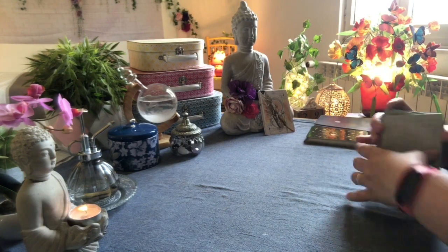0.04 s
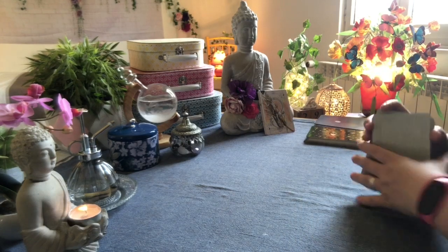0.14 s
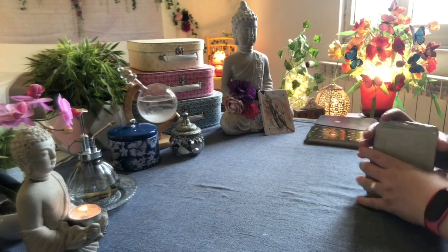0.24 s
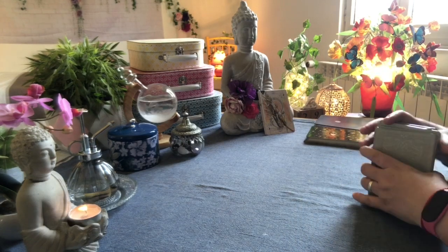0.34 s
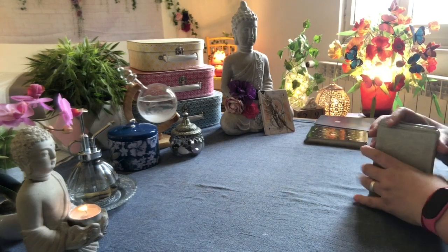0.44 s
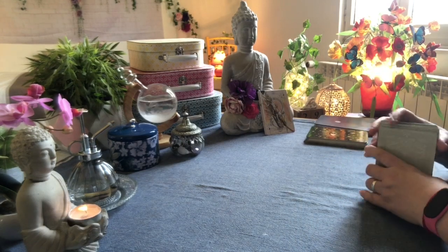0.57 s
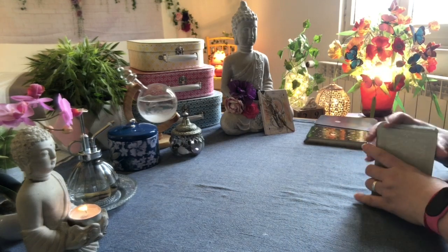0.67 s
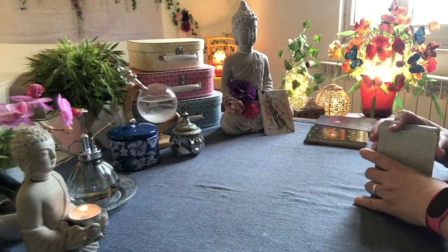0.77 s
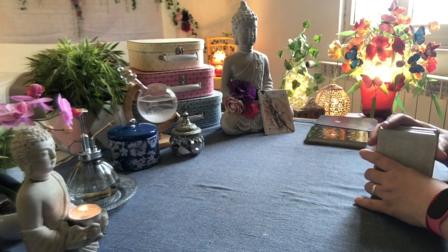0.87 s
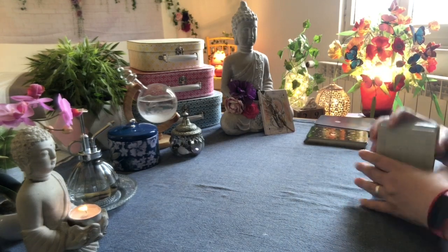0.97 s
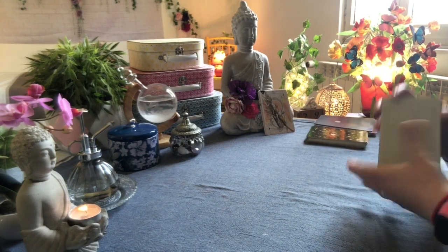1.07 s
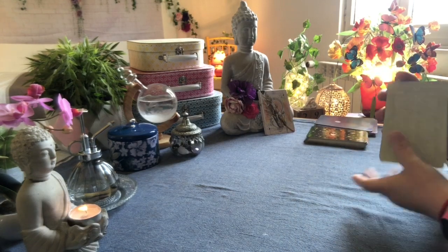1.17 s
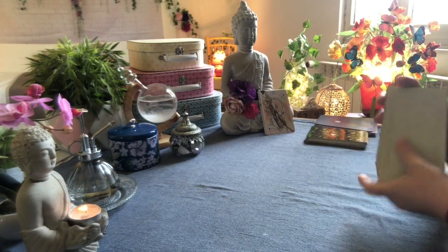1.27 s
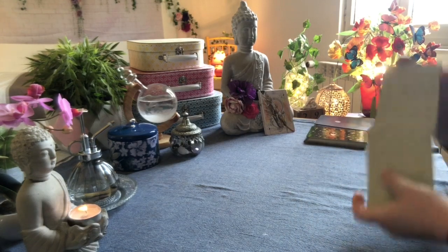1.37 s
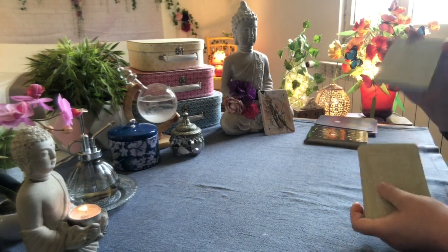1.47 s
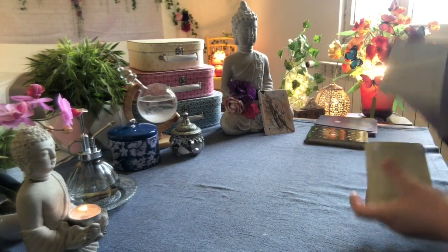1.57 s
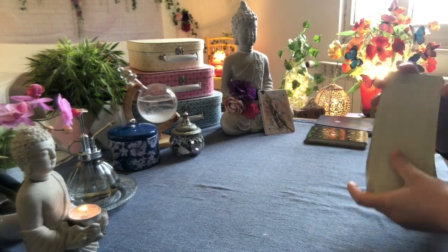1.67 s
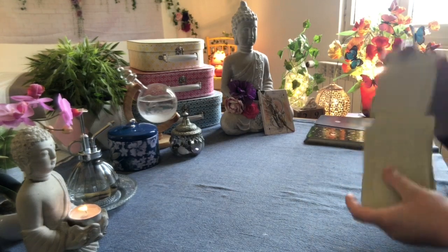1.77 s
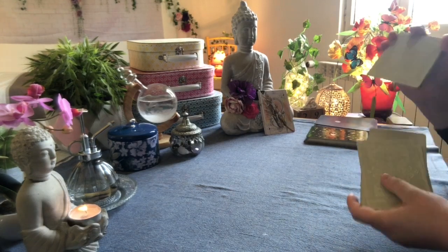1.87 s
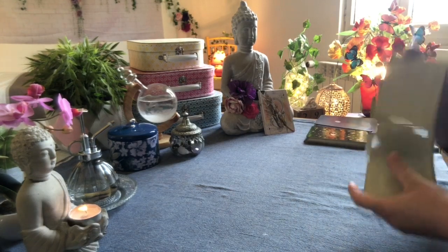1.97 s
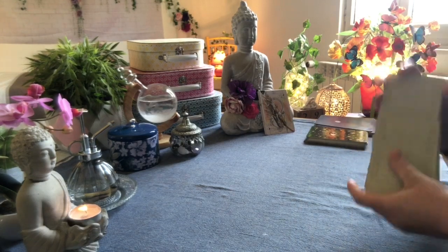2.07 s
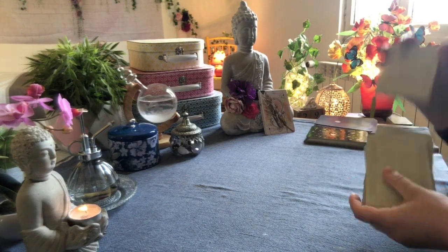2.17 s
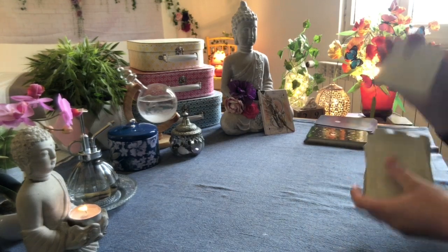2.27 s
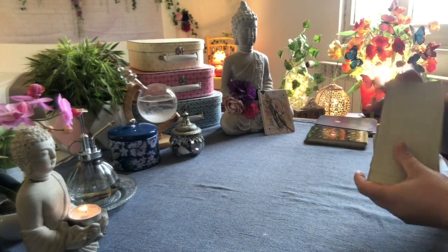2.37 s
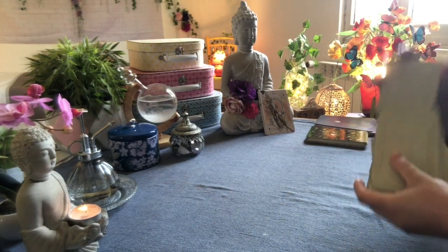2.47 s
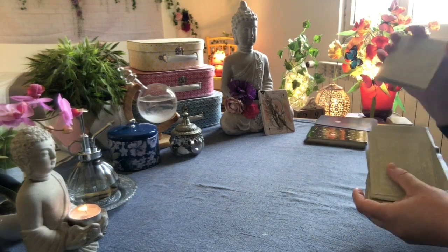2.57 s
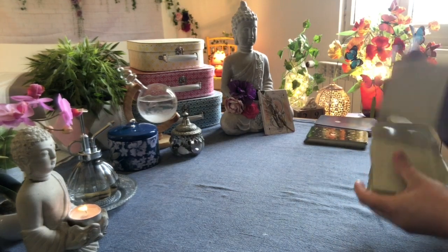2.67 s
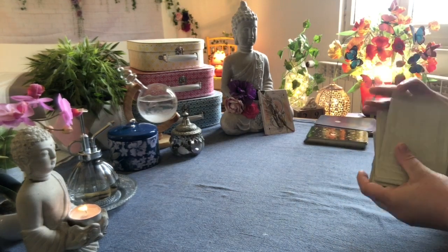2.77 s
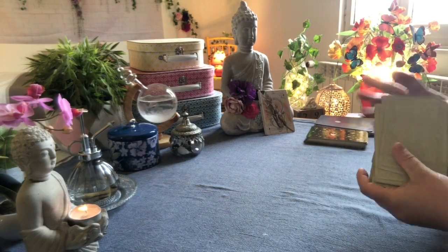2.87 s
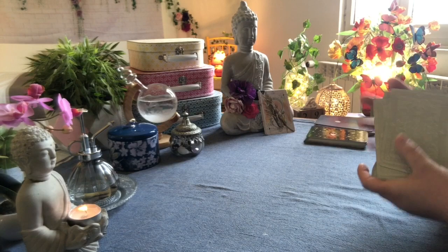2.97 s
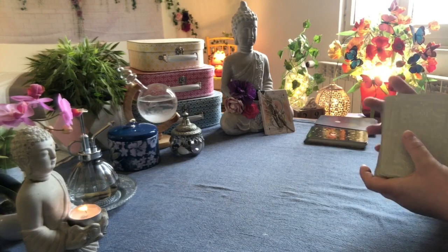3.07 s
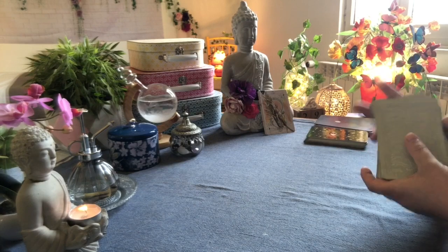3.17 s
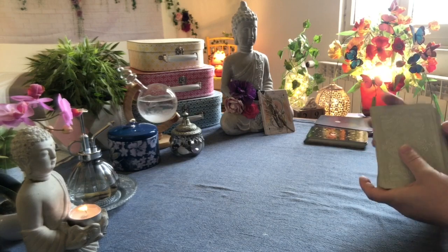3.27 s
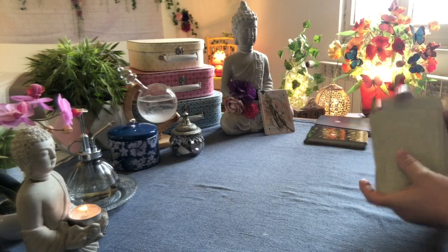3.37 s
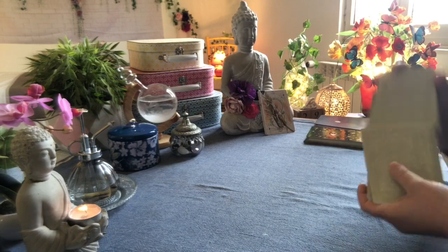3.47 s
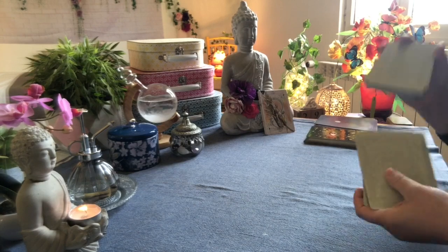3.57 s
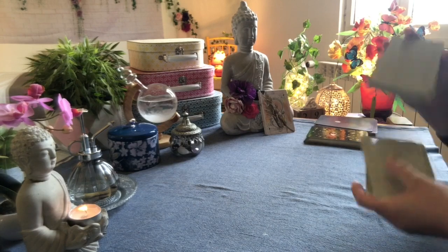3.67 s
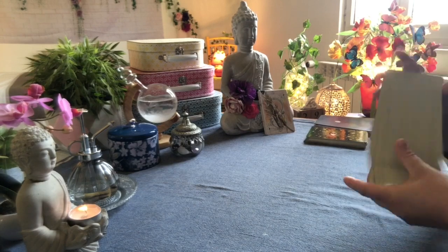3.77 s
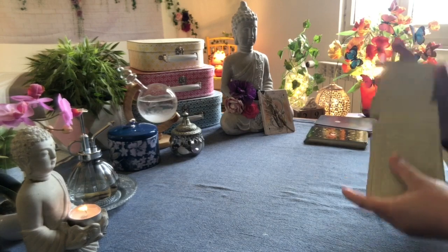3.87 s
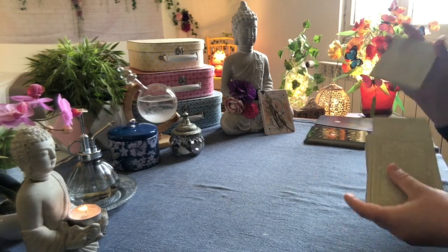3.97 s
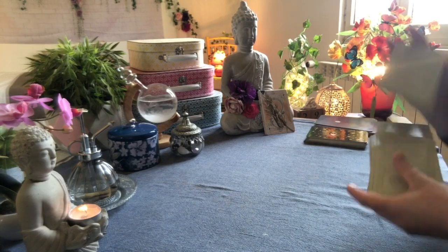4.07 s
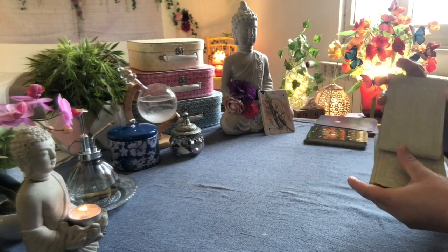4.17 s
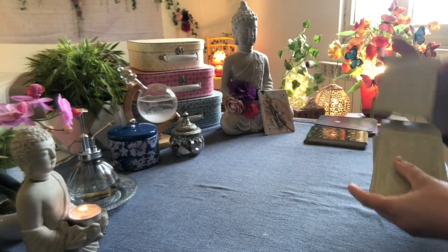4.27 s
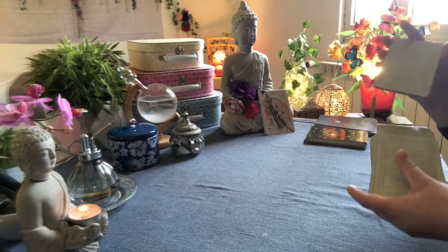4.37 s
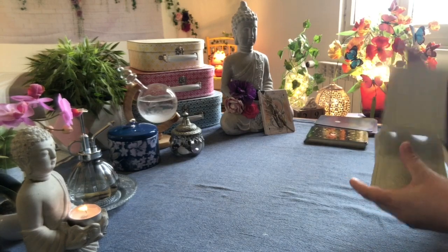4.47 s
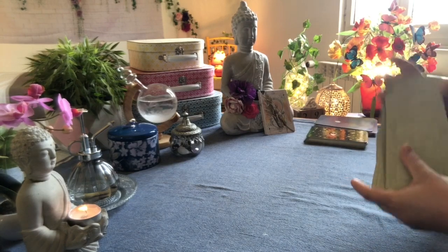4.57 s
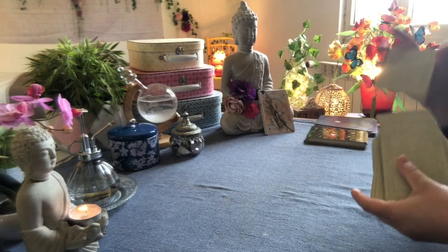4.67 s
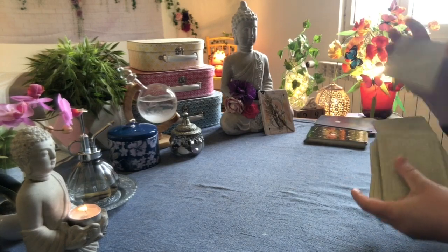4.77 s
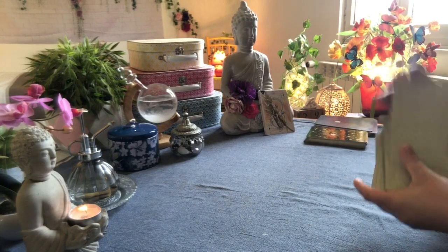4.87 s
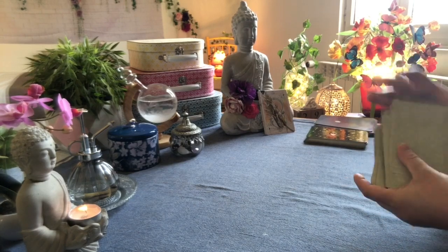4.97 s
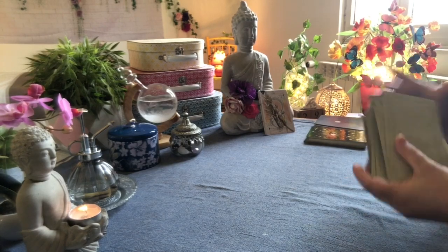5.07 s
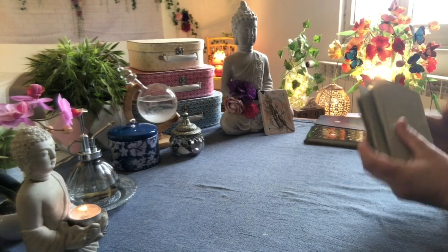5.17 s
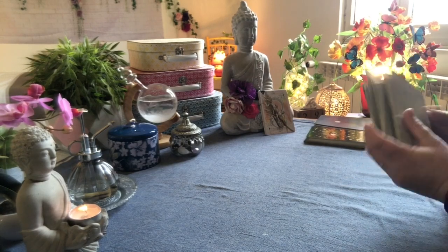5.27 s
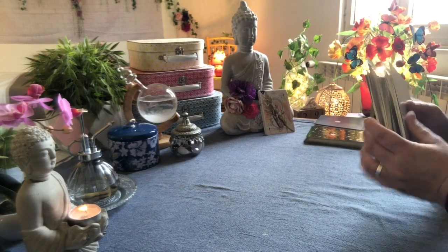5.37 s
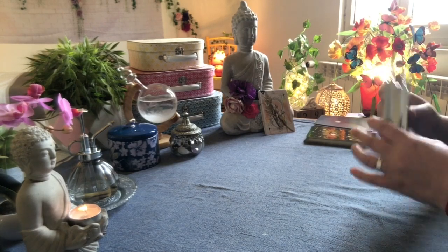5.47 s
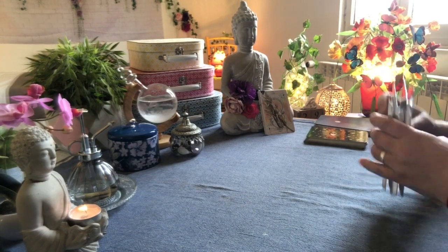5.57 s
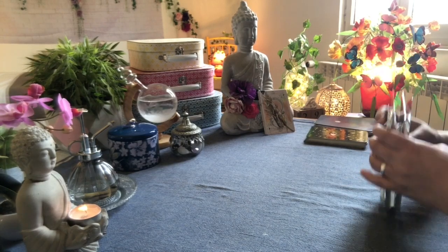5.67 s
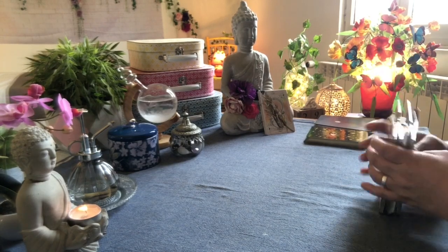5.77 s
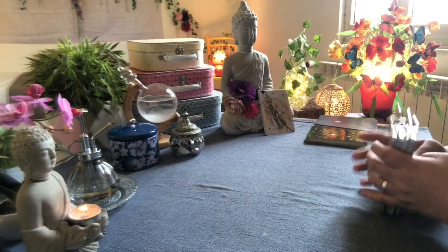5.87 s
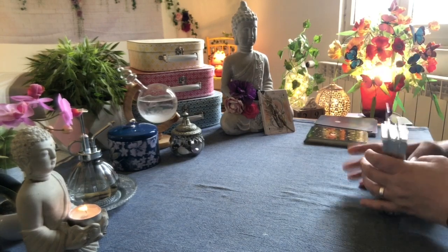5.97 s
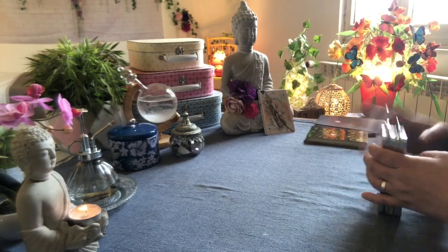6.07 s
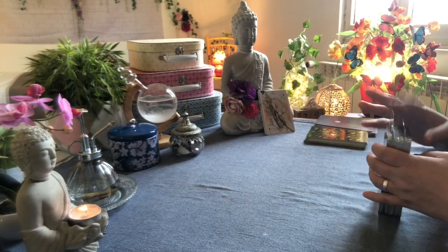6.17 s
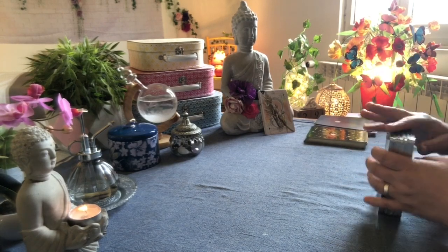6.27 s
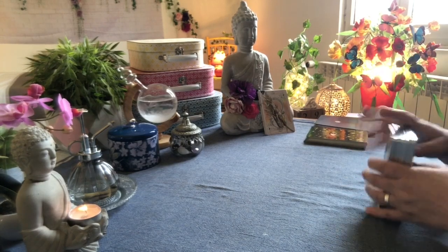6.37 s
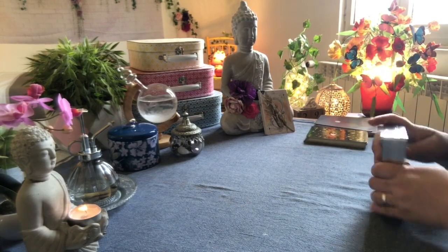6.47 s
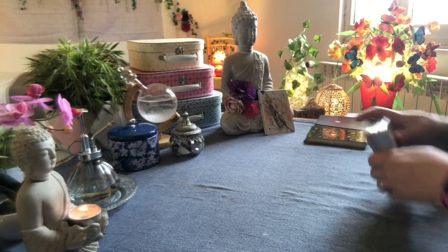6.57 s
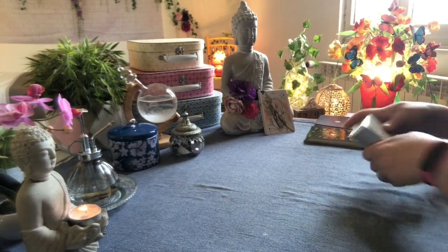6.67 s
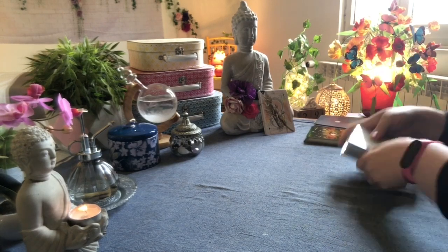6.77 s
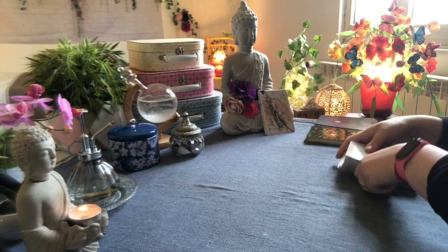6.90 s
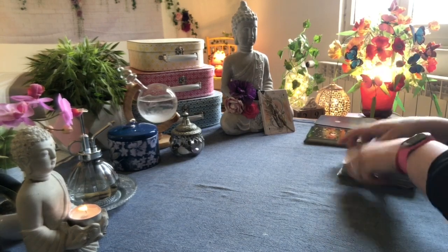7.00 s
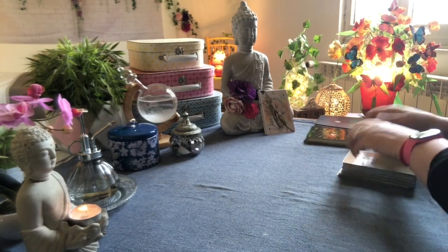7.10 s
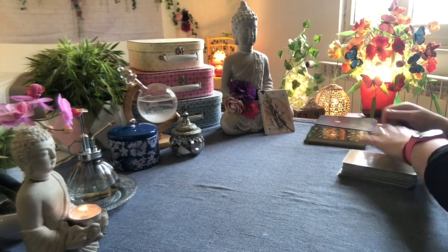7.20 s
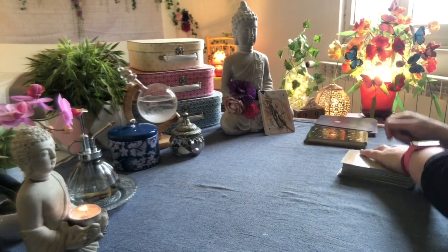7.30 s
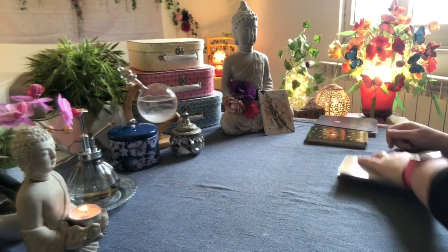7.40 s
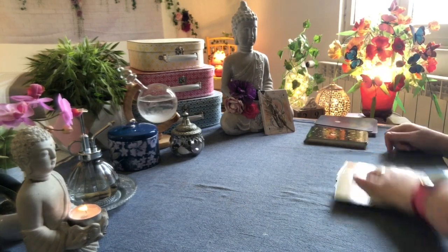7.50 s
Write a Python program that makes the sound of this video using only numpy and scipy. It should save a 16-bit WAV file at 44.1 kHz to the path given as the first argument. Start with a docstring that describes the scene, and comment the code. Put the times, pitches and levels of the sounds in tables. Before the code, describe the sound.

Large stiff cards are shuffled by hand close to a mono microphone, over faint steady room hush. After an early hollow table knock and light finger rubs come separate flicks, then slaps of packets dropping, each with a brief airy ring and a fading slide. The strongest cracks fall midway and slightly later. Finally sharp, low-booming table knocks and soft rustling as the deck is set down.

```python
"""Small, quiet room, cloth-covered table, heard close in mono: fingers rub a deck of large cards over a hush.
The deck is knocked square on the table, which booms. Then comes an overhand shuffle above it: packets slap
down with a burst of noise and a ring of squeezed air, slide on as clumped friction grains and tick off
the edge; two duller knocks mark a packet leaving the deck, and some cards squeak. At the end damped table
modes boom again as the deck is knocked square and laid down. Sparse, darkening reflections set the room."""
import sys
import numpy as np
from scipy import signal
from scipy.fft import rfft, irfft
from scipy.io import wavfile
from scipy.ndimage import uniform_filter1d

SR = 44100
rng = np.random.default_rng(int(sys.argv[2]) if len(sys.argv) > 2 else 0)


def unload_audio(sound):
    """Save the sound as a 16-bit wav file, at the path given as the first command line argument."""
    columns = np.transpose(np.atleast_2d(sound))
    # keep every value between -1 and 1, then stretch to whole-number steps
    steps = np.round(np.clip(columns, -1, 1) * 32767)
    wavfile.write(sys.argv[1], SR, steps.astype(np.int16))


N = 332514  # length in samples

# Event levels are relative: each source adds its own gain below.
# fingers and cards rubbing lightly, one row a movement:
# start_s, length_s, level_db, fastest_share (0-1 of the length), brightness_db_per_octave
RUB_MOVES = [(0.0, 0.036, -50, 0, -1.5), (0.202, 0.047, -53.5, 0.44, .5), (0.263, 0.052, -58, 0.4, 0.5),
             (0.417, 0.057, -62.5, .8, 3), (0.529, 0.062, -61, 0.18, 0), (0.667, 0.05, -61.5, 0.15, 4),
             (0.876, .33, -69, 0, 6.5), (1.231, 0.2, -53.5, 0.3, 1), (1.614, 0.063, -56, 0.47, 0.5),
             (1.999, 0.03, -64, 0.3, -1), (2.02, .009, -42, .9, 3), (2.359, 0.02, -43, 1, 0.5),
             (2.958, 0.097, -52, 0.45, -0.5), (3.064, 0.15, -65, 0.04, 5), (3.258, 0.2, -56.5, .5, 2.5),
             (3.471, 0.041, -53, .35, 2.5), (3.711, .03, -56, 0, -0.5), (3.76, 0.037, -56, 1, 1),
             (4.114, .045, -60.5, 0.67, 0), (4.164, 0.053, -52, 0, 2), (5.224, .025, -57, .3, -1),
             (5.269, 0.12, -54.5, .35, -.5), (5.359, 0.14, -59.5, 0.62, -1),
             (5.554, 0.061, -60.5, 0.54, 1.5), (5.694, .125, -54.5, 0, -1), (5.831, 0.21, -58, 0.18, 1.5),
             (6.204, 0.056, -52.5, 0.4, 3), (6.3, 0.26, -66, 0.7, 2.5), (6.59, 0.21, -66.5, 0.1, 1.5),
             (6.829, 0.028, -58, .5, -3), (6.892, 0.11, -58, 0.55, 0), (7.031, 0.044, -48, 0, -4.5),
             (7.2, 0.28, -62, 0.87, -3), (7.466, 0.17, -52, 0.6, -1.5)]
# the deck and hands meeting the table: start_s, knock_db, pitch_hz, boom_db, top_ring_db, contact_decay_s
TABLE_KNOCKS = [(0.228, -35.5, 486, -45.5, -37.5, 0.014), (0.553, -52, 1220, -60, -84, 0.0042),
                (0.695, -67, 400, -58.5, -70, 0.0074), (0.74, -57, 700, -71, -79, 0.0033),
                (0.863, -56, 380, -50, -63, 0.0027), (5.7, -23.5, 930, -32, -39.5, 0.0026),
                (5.72, -40, 1010, -49, -57, 0.008), (5.779, -36, 483, -41.5, -47, 0.0042),
                (6.016, -55.5, 370, -53, -79, 0.0059), (6.228, -52, 410, -45, -46.5, 0.047),
                (6.252, -37.5, 760, -47, -51, 0.006), (6.46, -68, 397, -59.5, -62.5, 0.0083),
                (6.837, -56.5, 383, -39, -57, 0.0091), (7.038, -37, 707, -31.5, -42, 0.0025),
                (7.315, -60, 215, -57, -67, 0.01), (7.372, -61.5, 284, -53, -57, 0.02),
                (7.518, -73, 630, -39.5, -54, 0.0067)]
# card edges snapping past each other: start_s, level_db, bright_snap_db
EDGE_TICKS = [(0.404, -48, -72), (1.2348, -45, -59), (1.4115, -30, -54), (1.8082, -28.5, -48),
              (1.991, -45, -63), (2.142, -37, -60), (2.4735, -28, -37), (2.5173, -36, -64),
              (2.7516, -42, -46), (2.962, -36.5, -77), (3.0615, -45, -69), (3.1058, -41.5, -61),
              (3.5234, -34, -53.5), (3.7158, -50, -66), (4.1659, -35.5, -51), (4.4318, -56, -79),
              (4.6844, -37.5, -50.5), (4.854, -46.5, -76), (4.9929, -33.5, -45), (5.128, -45.5, -74),
              (5.217, -46, -75), (5.3028, -38, -76)]
# packets slapping down on the deck, and two duller knocks (2.8089 s, 3.940 s) as a packet leaves it:
# start_s, clap_db, trapped_air_db, palm_push_db, clap_decay_s, air_pitch_hz, clap_lowpass_hz
PACKET_HITS = [(1.669, -30.5, -29, -34, 0.0045, 2780, 7100), (2.031, -39.5, -72, -47, 0.0021, 2540, 8000),
               (2.038, -39, -37, -43, .003, 2570, 6000), (2.056, -28, -60, -49, 0.00087, 2450, 9000),
               (2.063, -32, -55, -43.5, 0.0021, 2490, 8000), (2.3714, -21, -24, -30.5, 0.00043, 2630, 6900),
               (2.707, -30, -40, -42, 0.0012, 2660, 14000), (2.714, -29.5, -25, -40, 0.0031, 2720, 12000),
               (2.761, -34.5, -52, -47.5, 0.0045, 2520, 8000),
               (2.8089, -29, -27.5, -43.5, 0.0021, 1890, 5940),
               (3.7958, -15, -26.5, -39.5, 0.0034, 2640, 7900),
               (3.940, -24.5, -32, -42, 0.00039, 2030, 3370), (4.5243, -19, -16.5, -34, 0.0019, 2550, 6430),
               (4.875, -35.5, -38.5, -55, .002, 2645, 8900), (4.919, -40, -56.5, -43, 0.0043, 2480, 14000),
               (4.9535, -32, -38, -68, 0.004, 2500, 4000)]
# the deck bumping softly in the hand: start_s, level_db
HAND_BUMPS = [(1.672, -49.5), (2.035, -46.5), (2.067, -52), (2.156, -55), (2.713, -48.5), (2.74, -54),
              (2.813, -51), (3.064, -57), (4.925, -52.5)]
# packets sliding along the deck, fastest at the start:
# start_s, length_s, level_db, slowing_db_per_s, brightness_db_per_octave
PACKET_SLIDES = [(1.672, 0.129, -35.5, 93, 0.5), (2.032, 0.11, -39.5, 91, 1), (2.375, 0.14, -41, 79, 1),
                 (2.702, 0.11, -42.5, 65, 0.5), (3.804, .134, -35.5, 80, -0.9), (4.53, 0.14, -39, 135, -1),
                 (4.877, .11, -38.5, 140, 0.5)]
# a card catches and sings briefly as it slides: start_s, length_s, pitch_hz, level_db, unsteadiness_rms_share
CARD_SQUEAKS = [(1.976, 0.064, 2230, -61, 0.041), (2.761, 0.012, 778, -35.5, 0.21),
                (2.782, 0.024, 2148, -37, 0.255), (3.457, 0.036, 12650, -55, 0.044),
                (3.851, 0.032, 7600, -37.5, 0.0078), (3.894, 0.03, 7730, -50, 0.0078),
                (4.873, 0.045, 409, -45, 0.35), (4.918, 0.014, 517, -37.5, 0.17),
                (4.927, 0.03, 2300, -45.5, 0.018), (4.941, 0.018, 1846, -39.5, 0.14)]

# modes of table and room, of the table top, and the deepest one: pitch_hz, level_db, t60_s
BOOM_MODES = [(116.85, -2, 0.46), (146.5, -16.5, 0.66), (191.3, -13.5, 0.3)]
TOP_MODES = [(239.7, 6, 0.3), (362.5, 0.5, 0.5), (431, 11.5, 0.065), (494, -35, .35), (608, -8.5, 0.39),
             (795, -23, 0.79), (829, -6.5, 0.42), (910, -15.5, 0.21), (1008, -14.5, 0.045),
             (1158, -9.5, 0.16)]
SWAY_MODES = [(70, -2, 0.87)]

# spectra of the noise in each source: frequency_hz, relative_density_db (per Hz)
HUSH_COLOUR = [(12, -38.5), (20, -9.5), (81, 1), (285, 1), (1760, -13), (7730, -17), (10200, -21),
               (14700, -23.5), (16000, -28)]
RUB_COLOUR = [(180, -24), (300, -3.5), (511, -6), (749, -1.5), (1280, -3), (1530, -2), (1810, -3),
              (4230, -2.5), (7570, -4.5), (10200, -13.5), (12700, -12), (16000, -18.5)]
KNOCK_COLOUR = [(30, -36), (80, 1.5), (200, 11), (450, 8.5), (900, 3), (2000, -10.5), (5000, -1.5),
                (9000, -2), (16000, 1)]
TICK_COLOUR = [(200, -33), (800, -9.5), (2000, 1), (4000, -2.5), (7500, -6.5), (10000, -19.5),
               (16000, -18.5)]
SNAP_COLOUR = [(2000, -22), (9000, -10), (13000, 4.5), (16000, 7.5), (18000, -19.5)]
CLAP_COLOUR = [(200, -36), (700, -8), (1150, -10), (1700, -8), (2400, 3.5), (3500, -3), (5500, -1.5),
               (8000, -5), (10000, -11), (16000, -8)]
PALM_COLOUR = [(50, -30), (130, -22.5), (350, -3.5), (750, -2), (1100, -3.5), (1600, -12), (4000, -52.5)]
BUMP_COLOUR = [(30, -28), (80, -1.5), (160, -0.5), (300, -7.5), (550, -1.5), (1200, -30.5), (4000, -49)]
SLIDE_COLOUR = [(59, -41), (100, -11), (206, -17), (350, -7.5), (634, -11), (1170, -5.5), (1550, -2),
                (2470, -1), (3470, -4), (4380, -2.5), (5770, -5.5), (7450, -2.5), (10000, -9.5),
                (15000, -9.5), (16000, -26.5)]
# decay of the room: frequency_hz, t60_s, relative_level_db
ROOM_DECAY = [(98.9, 0.83, 1), (400, 0.48, -2), (1210, 0.46, 0), (2220, 0.32, -3), (4200, 0.37, -3),
              (7500, 0.17, 2), (15000, 0.17, 1)]

HUSH_DB = -66.5
RUB_SLACK_DB = 9  # a rub starts and ends this much under its fastest moment
PIVOT_HZ = 3000  # brightness tilts the colour of friction about this frequency
TICK_BODY_DB = -21  # the deck's dull knock against the tick, before their colours and gains
SWAY_DB, SWAY_GROWTH = -26, 0.53  # sway level at a boom_db of 0, and its dB per dB of boom
EDGE_HZ = 16050  # upper band limit of the recorder


def amp(db):
    """Decibels to gain."""
    return 10 ** (np.asarray(db) / 20)


def unit(x):
    """Scales to an rms of one."""
    return x / np.sqrt(np.mean(x ** 2) + 1e-20)


def read(points, hz):
    """Reads a table on a log-frequency axis."""
    f, value = np.transpose(points)
    return np.interp(np.log(hz + 1), np.log(f + 1), value)


def add(mix, s, sound):
    """Mixes a sound in at time s."""
    part = mix[max(round(s * SR), 0):][:len(sound)]
    part += sound[:len(part)]


def colour(x, points, size=4096):
    """Causal minimum-phase filter with the given spectrum; white noise keeps its power."""
    gain = unit(amp(read(points, abs(np.fft.fftfreq(size, 1 / SR)))))
    spectrum = np.exp(np.conj(signal.hilbert(np.log(gain))))
    taps = np.fft.ifft(spectrum).real
    return signal.oaconvolve(x, taps[:size // 2])[:len(x)]


def grains(count, spread_db):
    """Tiny contacts of random sign and very uneven size."""
    z = rng.standard_normal((count, 2))
    return unit(z[:, 0] * amp(spread_db * np.clip(z[:, 1], -2, 2)))


def waver(seconds):
    """Smooth chance of rms one that changes on the given time scale."""
    hz = np.fft.rfftfreq(N, 1 / SR)
    slow = rfft(rng.standard_normal(N)) / (1 + (2 * hz * seconds) ** 2)
    return unit(irfft(slow, N))


def burst(decay, spread_db, count=4096):
    """A contact: a dying cluster of clicks whose first moments have an rms near one."""
    shape = np.exp(-np.arange(count) / SR / max(decay, 1 / SR))
    x = grains(count, spread_db) * shape
    return x * np.linalg.norm(shape) / np.linalg.norm(x)


def ring(modes, rise, t, beat=.4):
    """Damped modes that swell over the rise time; each has two close neighbours that beat with it."""
    out = np.zeros(len(t))
    for hz, db, t60 in modes:
        pitches = hz + np.array([0, -1, 1]) * rng.uniform(7.9, 15.8, 3)
        turns = np.outer(pitches, t) + rng.random((3, 1))
        tones = np.array([1, beat, beat]) @ np.sin(2 * np.pi * turns)
        out += amp(db - 60 * t / t60) * tones
    return out * (1 - np.exp(-t / rise))


def push(width, t):
    """One smooth swing of pressure from a flat face that stops."""
    u = t / width
    return u * (2 - u) * np.exp(-u)


def hush():
    """The steady hush of the quiet room: coloured noise."""
    return amp(HUSH_DB) * colour(rng.standard_normal(N), HUSH_COLOUR)


def room(x, gap, size=20):
    """Sparse reflections of random sign, arriving after a gap (s); the decay depends on frequency."""
    taps = np.zeros(SR)
    at = np.arange(0, SR - size, size)
    taps[at + rng.integers(0, size, len(at))] = rng.choice([-1, 1], len(at))
    hz, t, z = signal.stft(taps, SR, nperseg=256)
    bands, *columns = np.transpose(ROOM_DECAY)
    t60, db = (np.interp(hz, bands, c)[:, None] for c in columns)
    tail = signal.istft(z * amp(db - 60 * t / t60), SR)[1]
    tail *= np.clip(np.arange(len(tail)) / SR / gap - 1, 0, 1)
    return signal.fftconvolve(x, tail / np.linalg.norm(tail))[:N]


def rub(s, length, db, fastest, bright):
    """A rub swells to its fastest moment and eases off: its start, level (s, dB) and brightness."""
    peak_s = length * np.clip(fastest, 0, 1)
    return s, [(0, db - RUB_SLACK_DB), (peak_s, db), (length, db - RUB_SLACK_DB)], bright


def friction(moves, points, spread_db, judder_db, judder_time, rise, fade):
    """Card fibres catch and slip: dense grains that come in clumps while the surfaces move."""
    out = np.zeros(N)
    fibres = unit(grains(N, spread_db) * amp(judder_db * waver(judder_time)))
    for start, rows, bright in moves:
        s, db = np.transpose(rows)
        part = fibres[max(round(start * SR), 0):][:SR // 2]
        t = np.arange(len(part)) / SR
        gate = np.clip(np.minimum(t / rise, 1 + (s[-1] - t) / fade), 0, 1)
        level = amp(np.interp(t, s, db)) * gate
        tilted = [(hz, d + bright * np.log2(hz / PIVOT_HZ)) for hz, d in points]
        add(out, start, colour(level * part, tilted))
    return out


def shifting(x, patchy_db):
    """As the cards bend and overlap, their brief resonances come and go."""
    z = signal.stft(x, SR, nperseg=256)[2]
    patches = uniform_filter1d(rng.standard_normal(z.shape), size=6, axis=1)  # smooth in time
    patches = unit(uniform_filter1d(patches, size=5, axis=0))  # and in frequency
    return signal.istft(z * amp(patchy_db * patches), SR)[1][:N]


def table():
    """The deck knocks hollowly as its cards jostle, dulled by the cloth; the top rings and the boom builds."""
    knock, rings = np.zeros((2, N))
    t = np.arange(SR) / SR
    for s, db, hz, boom_db, top_db, contact in TABLE_KNOCKS:
        blow = burst(contact, spread_db=1.5)
        hollow = [(hz / 4, -7), (hz * 1.3, -4), (hz, 0), (hz * 1.76, -2), (hz * 3.06, -17), (hz * 8, -41)]
        jostle = colour(blow, hollow)
        jostle = jostle * np.linalg.norm(blow) / np.linalg.norm(jostle)
        note = np.sin(2 * np.pi * hz * t) * np.exp(-t / contact) * (1 - np.exp(-t * hz))
        add(knock, s, amp(db - 4.0) * jostle)
        add(knock, s, amp(db - 0.5) * note)
        add(rings, s, amp(boom_db + 7.5) * ring(BOOM_MODES, 0.022, t, beat=0.25))
        add(rings, s, amp(top_db - 6) * ring(TOP_MODES, 0.0016, t, beat=0.69))
        add(rings, s, amp(SWAY_DB + SWAY_GROWTH * boom_db) * ring(SWAY_MODES, 0.034, t, beat=0.61))
    return amp(2.5) * colour(knock, KNOCK_COLOUR), rings


def ticks():
    """Single edges snap free, each with a small dull knock from the deck."""
    edge, body, snap = np.zeros((3, N))
    for s, db, snap_db in EDGE_TICKS:
        add(edge, s, amp(db) * burst(0.0027, spread_db=6))
        add(body, s, amp(db + TICK_BODY_DB) * burst(0.0074, spread_db=-2))
        add(snap, s, amp(snap_db) * burst(.0008, spread_db=-3))
    edge = amp(-7.5) * colour(edge, TICK_COLOUR)
    body = amp(1.5) * colour(body, PALM_COLOUR)
    return edge + body + amp(4.5) * colour(snap, SNAP_COLOUR)


def packet_hits():
    """Packets crack down or knock as they leave: a contact, a brief ring of air, then a push on the palm."""
    clap, air, palm = np.zeros((3, N))
    t = np.arange(4096) / SR
    for s, clap_db, air_db, palm_db, decay, air_hz, lowpass_hz in PACKET_HITS:
        # a flat-face click just after the first contact of the edge
        face = 3.7 * signal.unit_impulse(len(t), int(0.00077 * SR))
        contact = burst(decay, spread_db=6.0) + face
        soften = signal.butter(1, min(lowpass_hz, .45 * SR), fs=SR)
        add(clap, s, amp(clap_db) * signal.lfilter(*soften, contact))
        add(air, s, amp(air_db) * ring([(air_hz, 0, .012)], 0.0015, t, beat=0))
        add(palm, s + .0018, amp(palm_db) * (burst(0.0036, spread_db=9.0) + push(0.00046, t)))
    claps = amp(3) * colour(clap, CLAP_COLOUR) + amp(2.0) * colour(palm, PALM_COLOUR)
    return claps, amp(10.0) * air


def bumps():
    """The weight of the cards settles into the fingers with a low, soft thud."""
    out = np.zeros(N)
    for s, db in HAND_BUMPS:
        thud = colour(burst(0.0062, spread_db=4.0), BUMP_COLOUR)
        add(out, s, amp(db) * thud / abs(thud).max())
    return amp(7) * out


def stroke(s, length, db, slowing, bright):
    """A slide dies steadily as the packet slows: its start, level (s, dB) and brightness."""
    return s, [(0, db), (length, db - slowing * length)], bright


def squeaks():
    """Fast stick and slip of a card face: an unsteady note with a weak octave."""
    out, wobble = np.zeros(N), waver(0.0007)
    for s, length, hz, db, unsteady in CARD_SQUEAKS:
        window = np.hanning(int(length * SR))
        pitch = hz * (1 + unsteady * wobble[int(s * SR):][:len(window)])
        phase = 2 * np.pi * np.cumsum(pitch) / SR
        add(out, s, amp(db) * window * (np.sin(phase) + 0.14 * np.sin(2 * phase)))
    return out


def scene():
    """Cards, table and the steady hush, all in one room."""
    rubs = amp(-2.0) * friction([rub(*row) for row in RUB_MOVES], RUB_COLOUR, spread_db=5.5,
                                judder_db=2.0, judder_time=.007, rise=0.0027, fade=0.0096)
    slides = amp(-3.5) * friction([stroke(*row) for row in PACKET_SLIDES], SLIDE_COLOUR, spread_db=1.0,
                                  judder_db=2.5, judder_time=0.0052, rise=.002, fade=0.0092)
    sliding = shifting(slides + rubs, patchy_db=2.5) + squeaks()
    knock, rings = table()
    claps, air = packet_hits()
    hits = claps + ticks() + bumps()
    # the table's rings already include the room, so they send nothing to it
    sent = amp(-11.5) * hits + amp(-16.0) * air + amp(-9) * sliding + amp(-9.0) * knock
    echo = room(sent, gap=0.0057)
    return (hits + air + sliding + knock + rings + echo + hush())[None]


def record(dry):
    """The recorder's band limit: a steep linear-phase low-pass."""
    lowpass = signal.firwin(511, EDGE_HZ, window=("kaiser", 9), fs=SR)
    return signal.oaconvolve(dry, lowpass[None], "same")


dry = scene()
out = record(dry)
unload_audio(out)
```